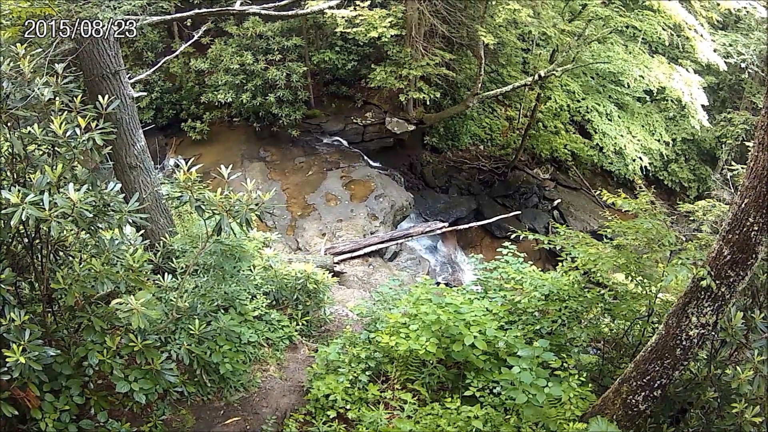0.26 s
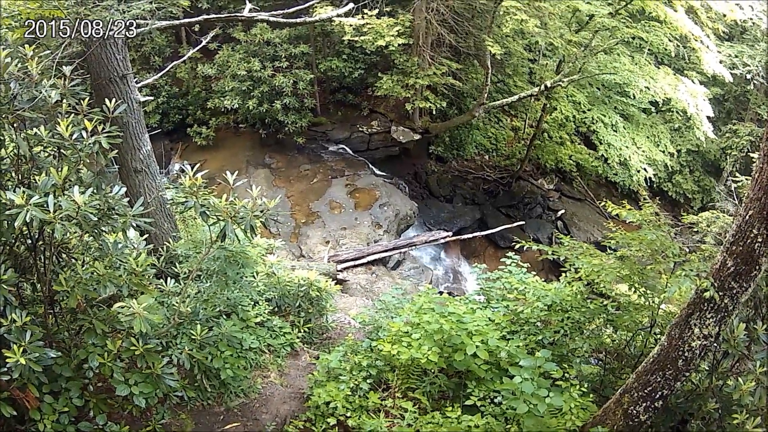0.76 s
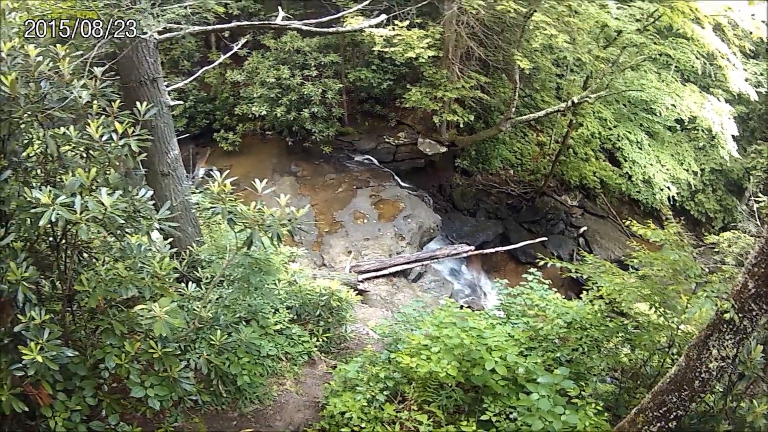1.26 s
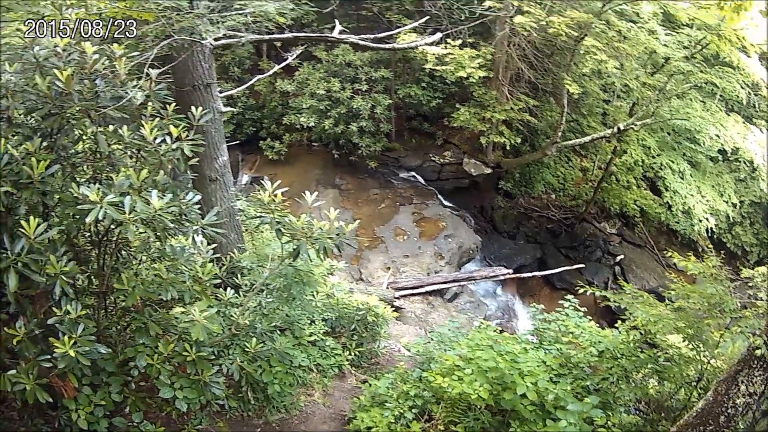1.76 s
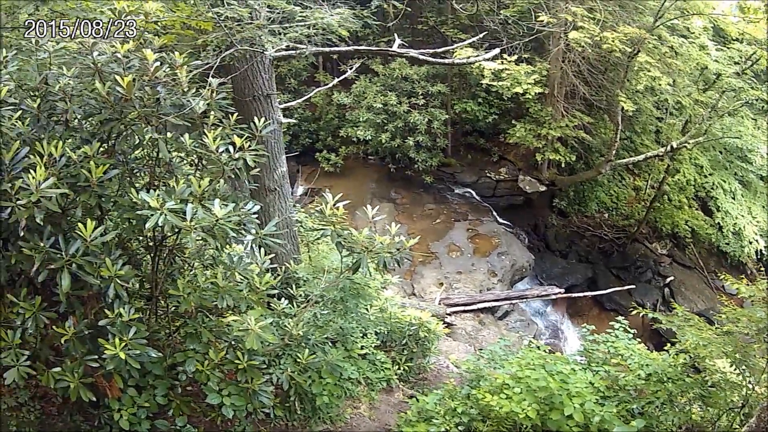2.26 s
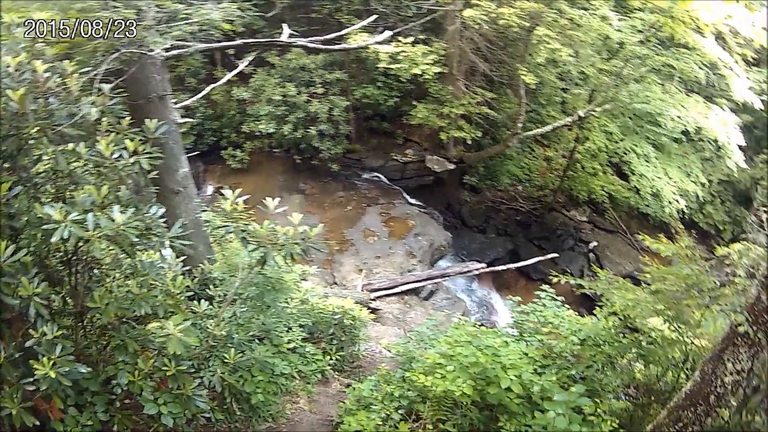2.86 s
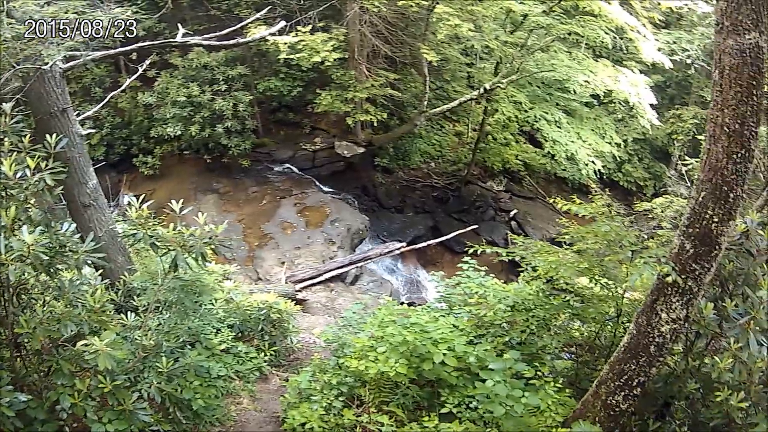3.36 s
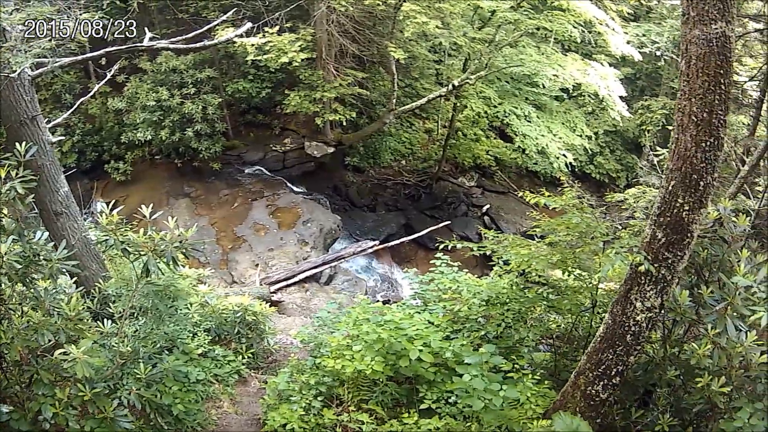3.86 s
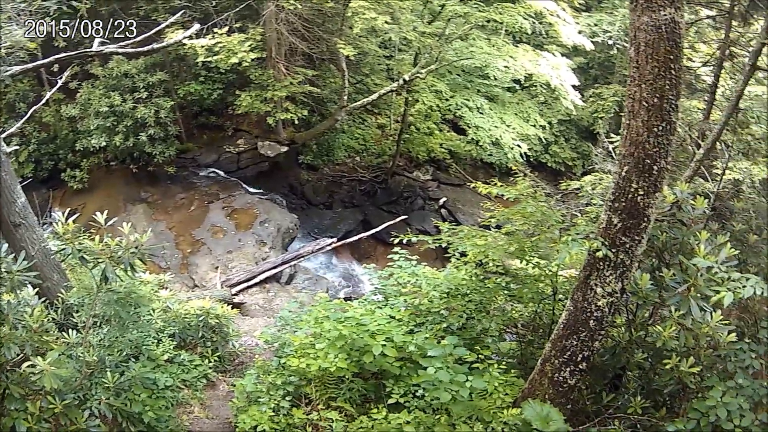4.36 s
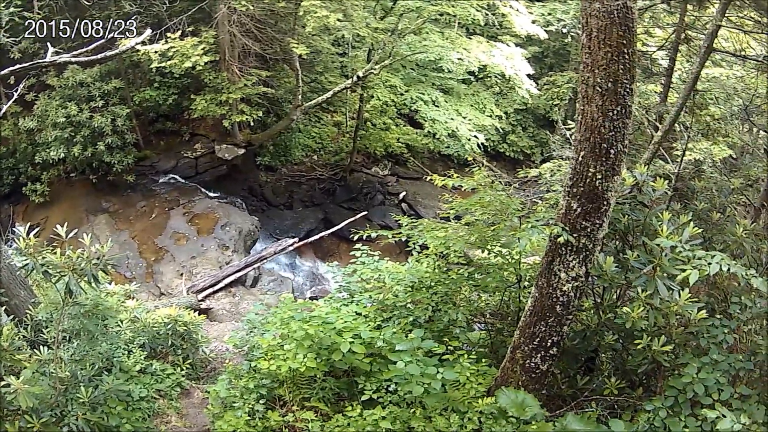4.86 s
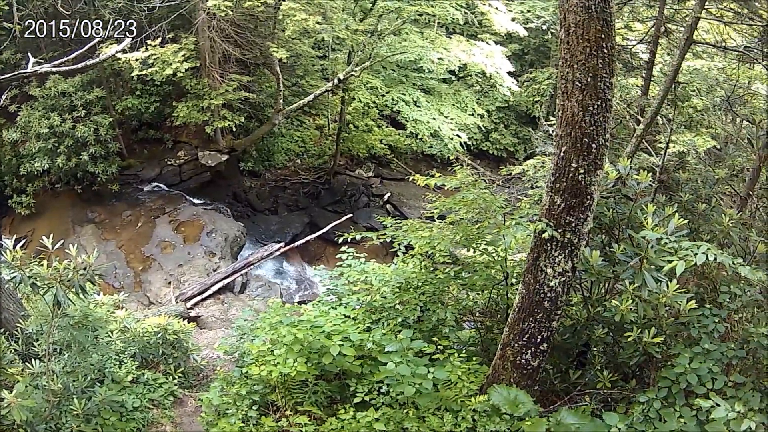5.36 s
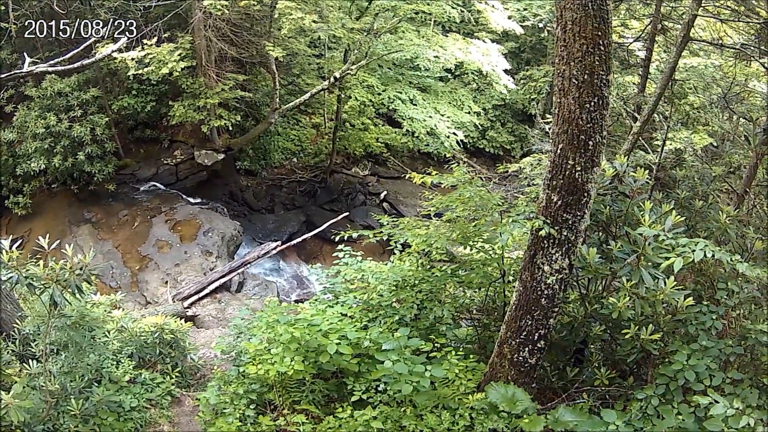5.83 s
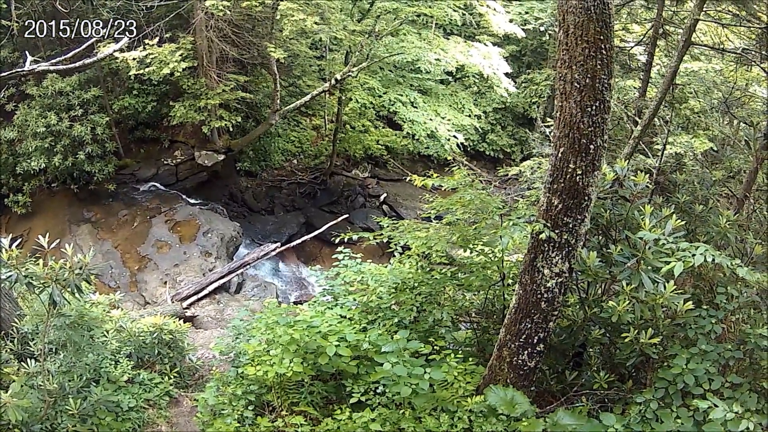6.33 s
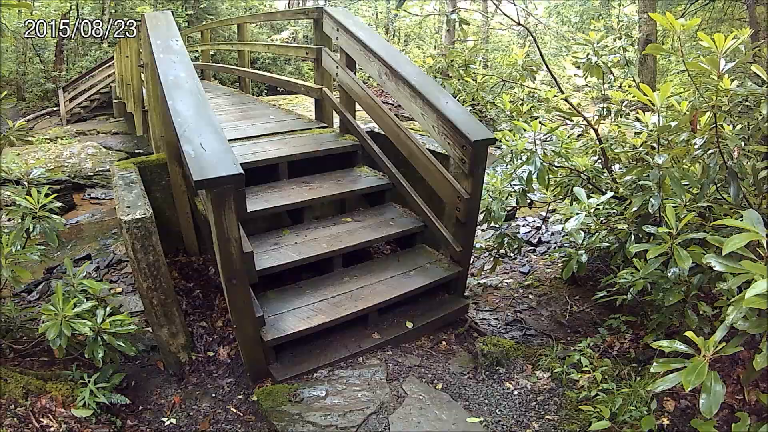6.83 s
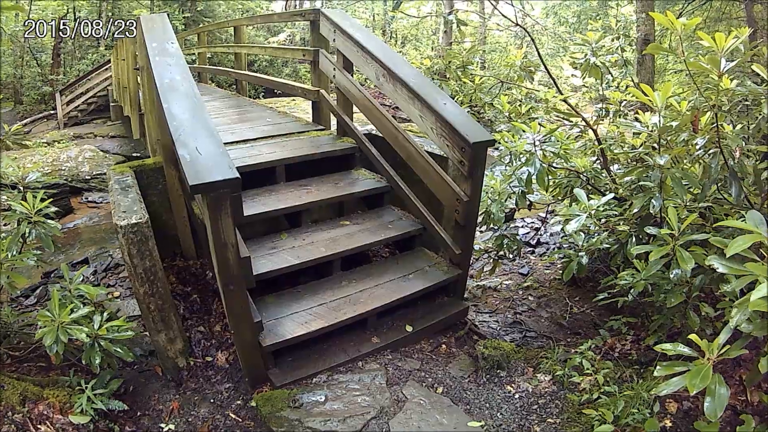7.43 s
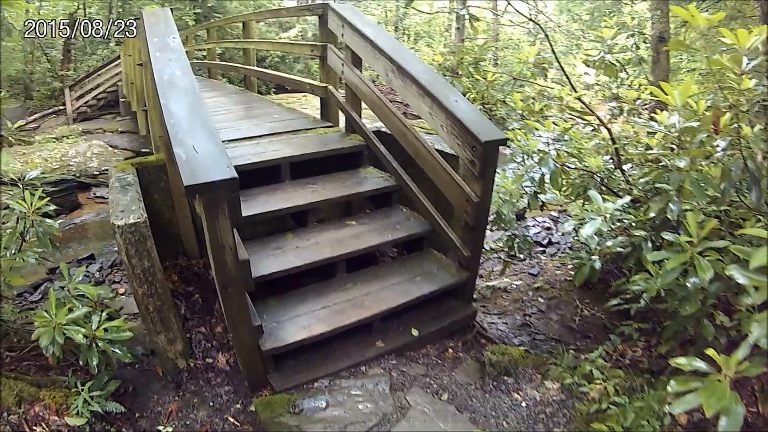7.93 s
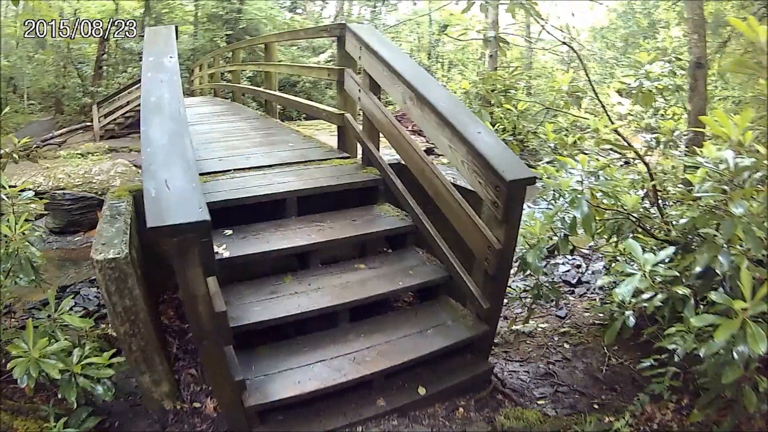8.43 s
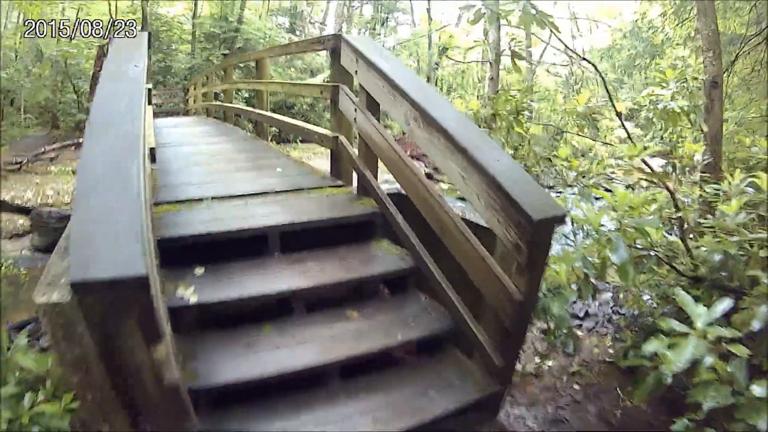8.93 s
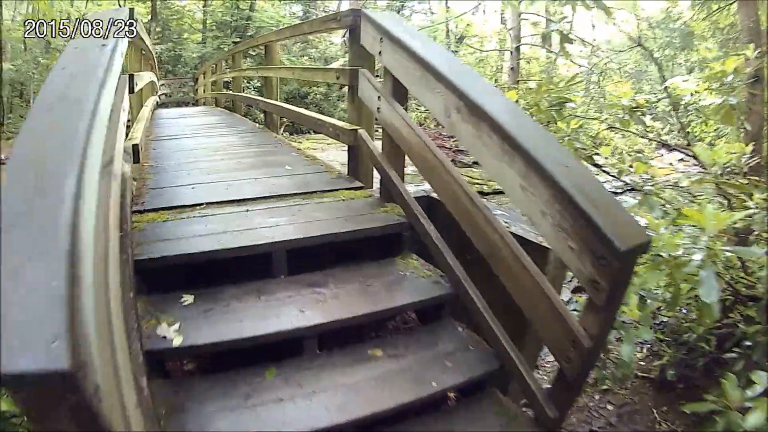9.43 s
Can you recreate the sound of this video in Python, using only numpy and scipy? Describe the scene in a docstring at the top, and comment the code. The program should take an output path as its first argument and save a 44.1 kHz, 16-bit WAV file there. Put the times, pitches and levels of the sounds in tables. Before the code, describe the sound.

Outdoors in woods, a small cascade rushes continuously, dense and mid-heavy as if heard through a sealed housing, its tone shifting slightly as the microphone turns. After nearly seven seconds there is a brief dead silence, then a quieter, farther stream. Two barely audible thin high whistles come, then crackling shoe clicks on gravel and leaves, a second softer crunch, and finally a short knock on a wooden step.

```python
"""A small cascade, splash noise with ringing bubbles, rushes below a camera in a sealed housing.
The camera tips up and back, then swings right, shifting the water's colour; a short silent cut follows.
By a footbridge the stream, the same splash and bubbles recoloured, is farther off. Two thin sine whistles
sound, a walker's shoes crunch in noise bursts, and a wooden step knocks with a brief sine ring.
The housing favours water and crunches at 1-3 kHz; hiss and two narrow notches apply to both places."""
import sys
import numpy as np
from scipy import signal
from scipy.fft import rfft, irfft, next_fast_len
from scipy.io import wavfile
from scipy.ndimage import uniform_filter1d

SR = 44100
rng = np.random.default_rng(int(sys.argv[2]) if len(sys.argv) > 2 else 0)


def materialize(psi):
    """Save the field psi as 16-bit PCM at rate SR to the path in sys.argv[1].

    A 1-D psi becomes a single channel; in a 2-D psi each row is a channel.
    """
    bounded = np.clip(np.atleast_2d(psi).T, -1, 1)
    quanta = np.round(bounded * 32767).astype(np.int16)
    wavfile.write(sys.argv[1], SR, quanta)


def field_ratio(decibels):
    """Amplitude ratio for a level in dB (20 dB per decade); scalars and array-likes work."""
    return 10 ** (np.asarray(decibels, dtype=float) / 20)


N = 427329

# The cascade's hollow, a colour laid on its splash: (frequency [Hz], gain [dB])
CASCADE_COLOUR = [(560, 0.5), (650, -2), (800, 1), (1150, -0.5), (1400, -0.5), (3400, 0), (3700, 2.5),
                  (4050, 0.5), (4250, -2.5), (4600, 1.5), (5200, 0)]
# The farther stream's colour: (frequency [Hz], gain [dB])
STREAM_COLOUR = [(60, 7.5), (160, 1.5), (300, 8.5), (480, 0), (800, 4.5), (1200, 0), (1500, 0), (2750, 1),
                 (3300, -3.5), (3600, -0.5), (4700, -2.5), (7000, -5), (11000, -5.5), (15000, 4.5)]
# The camera tips: (starts up [s], is up [s], starts back [s], is level [s])
TILT_TIMES = (1.1, 1.9, 2.6, 3.1)
# The camera swings right: (starts [s], arrives [s])
SWING_TIMES = (2.9, 4.8)
# Colour added when fully tipped up: (frequency [Hz], gain [dB])
TILT_COLOUR = [(2000, 0.5), (2900, 1.7), (3700, -0.1), (4800, -2.5), (7000, -0.5), (9000, -1.5),
               (10500, -2.5), (12000, -0.5), (13000, 0.1), (14000, -3.5), (15500, -2.6)]
# Colour added when fully swung right: (frequency [Hz], gain [dB])
SWING_COLOUR = [(1000, 0.46), (2250, 1), (2900, 0), (7000, 1.1), (10000, 0), (11000, 0), (12000, 3.3),
                (13000, 3.8), (14000, 1.9), (15500, .6)]
# Bright band sliding up in the swing: (start frequency [Hz], slide [Hz], Gaussian width [Hz], peak gain [dB])
SLIDING_BAND = (14000, 1200, 400, 5)
# The housing's wall, lows and mids: (frequency [Hz], gain [dB])
HOUSING_BODY = [(25, -48.5), (80, -45), (180, -35.5), (330, -31.5), (490, -20), (820, -15), (1100, -7),
                (1400, 0.5), (1700, 0), (2350, -5.5), (3000, -4.5), (3420, -12.5), (3900, -14.5),
                (4860, -25.5)]
# The housing's wall, treble: (frequency [Hz], gain [dB])
HOUSING_TREBLE = [(5600, -34.5), (6000, -50), (6500, -46.5), (7200, -44.5), (8000, -59.5), (8700, -48.5),
                  (9500, -44.5), (10500, -36.5), (11300, -39), (12000, -41), (12900, -49), (13900, -48),
                  (14700, -54.5), (15700, -51.5)]
# Shoe on gravel and leaves: (time [s], level [dB], length [s], brightness at 11.5 kHz before the housing [dB])
SHOE_CRUNCHES = [(8.08, -49, .27, -20), (8.137, -37, .001, -8), (8.1435, -34.5, .0008, -6),
                 (8.15, -38, .0008, -8), (8.162, -39, .008, 3), (8.17, -38.5, .009, 6),
                 (8.179, -40, .007, -8), (8.1875, -33.5, .002, -3), (8.216, -42, .005, -24),
                 (8.27, -39, .006, -20), (8.81, -49, .2, -24), (8.851, -40, .004, -24),
                 (8.862, -40, .004, -24), (8.995, -41, .005, -24)]
# Shoe on a wooden step: (time [s], blow before its swell [dB], pitch [Hz])
STEP_KNOCKS = [(9.5527, -16, 910)]
# Whistled notes: (time [s], length [s], peak level [dB])
WHISTLE_NOTES = [(7.6, .21, -90), (7.845, .075, -92)]
# Narrow cuts over everything: (centre [Hz], width [Hz])
NOTCH_BANDS = [(6000, 300), (8000, 400)]
# Silence between the two places: (start [s], end [s])
SILENT_CUT = (6.7739, 6.95083)

CASCADE_DB, STREAM_DB, HISS_DB = -34.5, -43.5, -88.5  # rms levels, dB
WHISTLE_HZ, WHISTLE_EDGE_S = 7020, .025


def unit(x):
    """Scale to rms 1."""
    return x / np.sqrt(np.mean(x ** 2) + 1e-20)


def along(points, hz):
    """Read a (frequency [Hz], value) curve on a log frequency axis."""
    point_hz, values = np.transpose(points)
    return np.interp(np.log(hz + 1), np.log(point_hz + 1), values)


def filtered(x, response):
    """Shape the spectrum of x by a response that is a function of frequency."""
    size = next_fast_len(N + 8192)  # room for the filter's tail
    spectrum = rfft(x, size) * response(np.fft.rfftfreq(size, 1 / SR))
    return irfft(spectrum, size)[..., :N]


def cascade():
    """Water falling close by in its hollow, its spray recoloured as the camera turns."""
    return water(CASCADE_DB, CASCADE_COLOUR, patchy_db=0.5, surge_db=0.16,
                 bubble_db=-15, count=14000, turning=True)


def stream():
    """The same kind of splash farther off, quieter, with stronger surges and a fixed aim."""
    return water(STREAM_DB, STREAM_COLOUR, patchy_db=0.24, surge_db=.5,
                 bubble_db=-15, count=12000, turning=False)


def water(level_db, colour, patchy_db, surge_db, bubble_db, count, turning):
    """Dense splash noise with bubbles in it, roughened by patches in pitch and time and by overall surges."""
    splash = rng.standard_normal(N)
    ringing = bubbles(count, mid_hz=1800, octaves=.8, cycles=5, spread_db=1.2)
    hz, t, spectrum = signal.stft(splash + field_ratio(bubble_db) * ringing, SR, nperseg=512)
    patches = uniform_filter1d(rng.standard_normal(spectrum.shape), size=8, axis=0)
    patches = uniform_filter1d(patches, size=12, axis=1)
    surges = uniform_filter1d(rng.standard_normal(len(t)), size=10)
    gain_db = along(colour, hz)[:, None] + patchy_db * unit(patches) + surge_db * unit(surges)
    if turning:
        gain_db = gain_db + aim(hz, t)
    rough = signal.istft(spectrum * field_ratio(gain_db), SR, nperseg=512)[1][:N]
    return field_ratio(level_db) * unit(housing(rough))


def bubbles(count, mid_hz, octaves, cycles, spread_db):
    """Trapped air rings for a few cycles, rising in pitch as it nears the surface."""
    place, chance = rng.random((2, count, 1))
    hz = np.clip(mid_hz * 2 ** (octaves * rng.standard_normal((count, 1))), 300, 9000)
    t = np.arange(400) / SR
    age = t * hz / cycles
    size = field_ratio(-spread_db * np.log(chance))  # mostly small, a few large
    swell_and_fade = age * np.exp(-3 * age)
    rings = size * swell_and_fade * np.sin(2 * np.pi * hz * t * (1 + 0.083 * age))
    at = (place * N).astype(int) + np.arange(len(t))
    return unit(np.bincount(at.ravel(), rings.ravel(), N + len(t))[:N])


def aim(hz, t):
    """Colour in dB, frequency by time, as the housing shades the microphone in the tip and swing."""
    tilt = np.interp(t, TILT_TIMES, [0, 1, 1, 0])
    swing = np.interp(t, SWING_TIMES, [0, 1])
    from_hz, slide_hz, width_hz, band_db = SLIDING_BAND
    offset_hz = hz[:, None] - from_hz - slide_hz * swing
    # the band is strongest midway through the swing
    band = np.sin(np.pi * swing) ** .5 * np.exp(-.5 * (offset_hz / width_hz) ** 2)
    moves_db = along(TILT_COLOUR, hz)[:, None] * tilt + along(SWING_COLOUR, hz)[:, None] * swing
    return moves_db + band_db * band


def housing(x):
    """The wall of the housing resonates in the middle and damps both ends."""
    return filtered(x, lambda hz: field_ratio(along(HOUSING_BODY + HOUSING_TREBLE, hz)))


def crunches():
    """Grit under a shoe gives way in uneven noise bursts, the shortest of them sharp clicks."""
    out = np.zeros(N)
    tail = 200  # samples
    for start_s, level_db, length_s, bright_db in SHOE_CRUNCHES:
        n = round(length_s * SR)
        unevenness = unit(uniform_filter1d(rng.standard_normal(n + tail), size=20))
        grit = rng.standard_normal(n + tail) * field_ratio(3.5 * unevenness)
        grit[n:] *= np.exp(-np.arange(tail) / 25)
        burst = np.zeros(N)
        burst[round(start_s * SR):][:len(grit)] = grit
        colour = [(1500, 0), (4000, bright_db / 2), (7000, min(bright_db, 0)),
                  (11500, bright_db), (14000, bright_db + 1)]  # (Hz, dB)
        burst = housing(filtered(burst, lambda hz: field_ratio(along(colour, hz))))
        out += field_ratio(level_db) * unit(burst) * np.sqrt(n / N)  # level over the burst's own length
    return out


def knocks():
    """A soft sole takes a moment to load the plank, which rings once, briefly."""
    out = np.zeros(N)
    t = np.arange(SR // 20) / SR
    swell = (1 - np.exp(-t / .002)) ** 2  # 2 ms to load the plank
    fade = field_ratio(-60 * t / .015)  # 60 dB down in 15 ms
    for start_s, blow_db, hz in STEP_KNOCKS:
        out[round(start_s * SR):][:len(t)] += field_ratio(blow_db) * swell * fade * np.sin(2 * np.pi * hz * t)
    return out


def whistle():
    """Faint, thin, steady sine notes with soft edges, as from a far bird or insect."""
    t = np.arange(N) / SR
    level = np.zeros(N)
    for start_s, length_s, level_db in WHISTLE_NOTES:
        inside_s = np.minimum(t - start_s, start_s + length_s - t)  # time to the nearer edge
        level += field_ratio(level_db) * np.clip(inside_s / WHISTLE_EDGE_S + .5, 0, 1)
    return level * np.sin(2 * np.pi * WHISTLE_HZ * t)


def hiss(shape):
    """The microphone's own even, white noise."""
    return field_ratio(HISS_DB) * rng.standard_normal(shape)


def notches(hz):
    """Response of resonant cuts, each removing a narrow band around its centre."""
    response = np.ones(len(hz), complex)
    for centre, width in NOTCH_BANDS:
        response *= 1 - 1j * hz * width / (centre ** 2 - hz ** 2 + 1j * hz * width)
    return response


def scene():
    """The near cascade, then the footbridge with its stream, walker and whistle."""
    near = cascade()
    far = stream() + crunches() + knocks() + whistle()
    return np.where(np.arange(N) / SR < np.mean(SILENT_CUT), near, far)[None]


def band_limit(x):
    """A steep low-pass at the top of the band."""
    return signal.sosfilt(signal.butter(12, 15760, fs=SR, output="sos"), x)


def record(dry):
    """Add microphone hiss, carve the two notches and make the hard silent cut."""
    heard = filtered(dry + hiss(dry.shape), notches)
    t = np.arange(N) / SR
    sounding = (t < SILENT_CUT[0]) | (t > SILENT_CUT[1])
    return band_limit(heard * sounding)


dry = scene()
out = record(dry)
materialize(out)
```